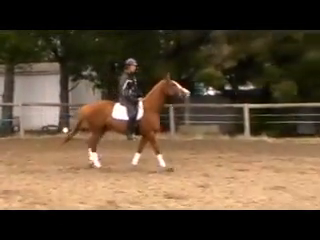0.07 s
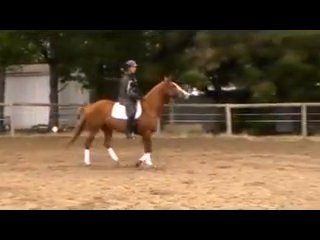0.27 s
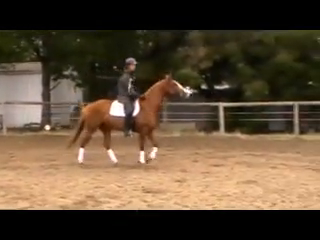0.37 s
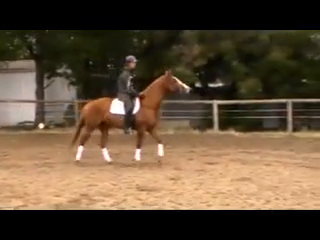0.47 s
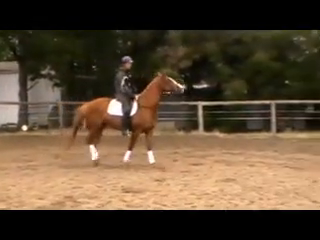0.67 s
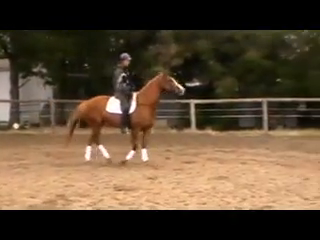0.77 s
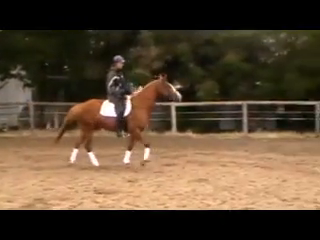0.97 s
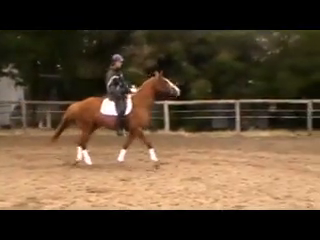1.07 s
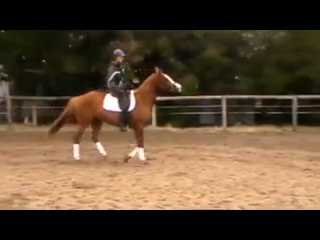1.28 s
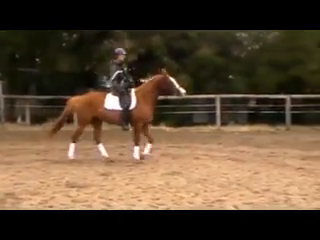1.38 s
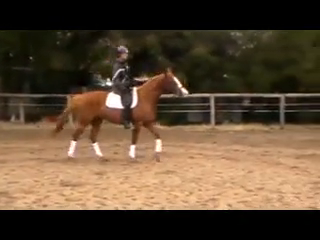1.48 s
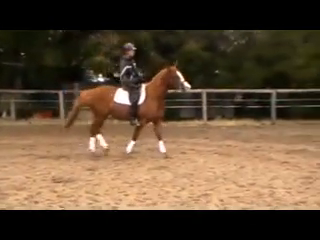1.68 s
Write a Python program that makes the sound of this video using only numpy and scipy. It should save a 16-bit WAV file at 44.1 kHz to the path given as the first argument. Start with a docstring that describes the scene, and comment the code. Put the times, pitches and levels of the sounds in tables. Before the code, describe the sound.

A horse whinnies close by, a high squeal breaking into a hoarse, wavering call.

```python
"""Riding gear (tack) ticks over wind rumbling on the microphone, then a horse whinnies close by in an
open sand arena. Its fast-vibrating vocal folds make a rising squeal, which breaks into a hoarse roar
of air rushing through the throat; a low wavering voice joins in and fades. Hooves thud softly on
the sand, small birds chirp, and a short echo follows."""
import sys
import numpy as np
from scipy import signal
from scipy.fft import rfft, irfft
from scipy.io import wavfile
from scipy.ndimage import uniform_filter1d, map_coordinates

SR = 44100
rng = np.random.default_rng(int(sys.argv[2]) if len(sys.argv) > 2 else 0)


def persist_wave(psi):
    """Save psi, clipped to +-1, as 16-bit WAV."""
    counts = np.round(np.clip(psi, -1, 1) * 32767).astype(np.int16)
    wavfile.write(sys.argv[1], SR, np.atleast_2d(counts).T)


N = 77175
T = np.arange(N) / SR
FREQ_HZ = np.fft.rfftfreq(N, 1 / SR) + 1  # the extra 1 Hz avoids log(0)


def from_db(db):
    return 10 ** (np.asarray(db) / 20)


def curves(table, outside=None):
    """Join a table's rows with straight lines in time: one curve per column after the first."""
    times, *columns = np.array(table, float).T
    return [np.interp(T, times, column, outside, outside) for column in columns]


def colour(table, hz):
    """Gain at each frequency, from rows of frequency_hz, gain_db."""
    points_hz, db = np.array(table, float).T
    return from_db(np.interp(np.log(hz), np.log(points_hz), db, left=db[0] - 90))


def noise(gain, channels=1):
    """Noise of average power 1, its frequencies weighted by gain."""
    shaped = irfft(rfft(rng.standard_normal((channels, N))) * gain, N)
    return shaped / np.sqrt(np.mean(shaped ** 2, axis=-1, keepdims=True))


def wander(rate_hz):
    """A smooth random wobble, about 1 in size."""
    return noise(1 / (1 + (FREQ_HZ / rate_hz) ** 2))[0]


def phase_of(hz):
    """The running angle of a wave whose pitch changes."""
    return 2 * np.pi * np.cumsum(hz) / SR


def during(table):
    """One while a table lasts, zero outside it, with soft ends."""
    start_s, end_s = table[0][0], table[-1][0]
    return np.interp(T, [start_s - .01, start_s, end_s, end_s + .01], [0, 1, 1, 0])


def fade(start_s, decay_s, attack_s=1e-5):
    """A quick rise, then a fall of 60 dB every decay_s."""
    age = np.maximum(T - start_s, 0)
    return (1 - np.exp(-age / attack_s)) * np.exp(-np.log(1000) * age / decay_s)


def swell(start_s, length_s):
    """A rounded rise and fall, and the progress through it from 0 to 1."""
    progress = np.clip((T - start_s) / length_s, 0, 1)
    return np.sqrt(np.abs(np.sin(np.pi * progress))) * (progress < 1), progress


def air():
    """A faint outdoor hiss, mostly the same in both ears."""
    # tone of the hiss: frequency_hz, gain_db
    spectrum = [(88, -58), (150, 3.5), (2920, -15.5), (8150, -22), (11200, -33), (13000, -70)]
    hiss = noise(colour(spectrum, FREQ_HZ), channels=3)
    return (0.33 * hiss[0] + 0.13 * hiss[1:]) * from_db(-39 + 1.3 * wander(3.6))


def wind():
    """Gusts hit the microphone and make a deep, uneven rumble."""
    # tone of the rumble: frequency_hz, gain_db
    spectrum = [(12, -49), (20, -11), (170, -4.5), (290, -120)]
    # strength of the wind: time_s, gain_db
    strength = [(0, -55.5), (.35, -56.5), (.55, -39.5), (1.1, -51.5), (1.75, -44.5)]
    gust = noise(colour(spectrum, FREQ_HZ) / (1 + (FREQ_HZ / 140) ** 6), channels=2)
    shifted = signal.hilbert(gust[0]).imag  # the left gust, a quarter cycle later
    stereo = np.array([1.45 * gust[0], 0.57 * gust[1] + 1.4 * shifted])
    return stereo * from_db(curves(strength)[0] + 3.14 * wander(24))


def tack_ticks():
    """The riding gear makes short dry clicks, each with a faint tail."""
    # clicks: start_s, peak_db, centre_hz, width_hz
    clicks = [(0.048, -33.5, 1830, 1190), (0.085, -18.5, 4400, 6770), (0.1215, -34.5, 1267, 1410),
              (0.156, -36, 3380, 1550), (1.552, -39.5, 8670, 4000), (1.617, -38, 7000, 8100),
              (1.669, -30.5, 5500, 7040)]
    out = 0
    for start_s, db, hz, width_hz in clicks:
        edges_hz = np.clip([hz - width_hz / 2, hz + width_hz / 2], 100, .45 * SR)
        snap = fade(start_s, decay_s=0.015, attack_s=0.00037)
        tail = from_db(-33) * fade(start_s, decay_s=0.05)
        burst = rng.standard_normal(N) * (snap + tail)
        click = signal.sosfilt(signal.butter(2, edges_hz, "band", fs=SR, output="sos"), burst)
        out = out + from_db(db) * click / np.abs(click).max()
    return out


def throat():
    """The throat boosts some frequencies (its resonances) and muffles those between."""
    # resonances: centre_hz, width_hz, gain_db
    resonances = [(584.5, 130, 1.5), (966, 133, -2.5), (1610, 139, -1.5), (1890, 320, -7), (2247, 200, -1),
                  (3140, 480, -10.5), (3680, 370, -8.5), (5678, 290, -7.5), (6330, 610, -11.5),
                  (7920, 4400, -15.5)]
    # valleys between the resonances: frequency_hz, gain_db
    valleys = [(100, -19), (380, -91), (800, -11), (2600, -20), (5000, -23.5), (12000, -57)]
    power = colour(valleys, FREQ_HZ) ** 2
    for hz, width_hz, db in resonances:
        power = power + from_db(db) ** 2 / (1 + (2 * (FREQ_HZ - hz) / width_hz) ** 2) ** 2
    return np.sqrt(power)


def roar(voice_cycle, mouth):
    """Air rushes through throat and chest, puffing once per cycle of the low voice."""
    # borders of four noise bands: frequency_hz
    edges = [440, 1250, 2700, 4900, 14000]
    # loudness of the bands: time_s, low_db, low_mid_db, high_mid_db, high_db
    loudness = [(.17, -68, -82, -81.5, -71), (.195, -59, -40, -63, -51.5), (.215, -43.5, -35.5, -43.5, -48),
                (.28, -38, -28, -34, -34.5), (.31, -55, -38, -58, -39.5), (.43, -49.5, -30, -32, -34),
                (.46, -35.5, -24.5, -26, -35), (.55, -31, -21.5, -24.5, -35.5),
                (.672, -29, -17, -25.5, -32), (.705, -31, -23, -33, -34.5), (.765, -20, -17, -27, -33.5),
                (.81, -23.5, -19, -30.5, -35.5), (.862, -26, -22.5, -29.5, -28),
                (.885, -20.5, -18, -27.5, -33), (.958, -30, -22.5, -32, -32),
                (1.006, -25.5, -20, -25.5, -33), (1.04, -24, -22, -31, -33),
                (1.064, -28.5, -26, -28.5, -35), (1.145, -24.5, -21, -29.5, -31.5),
                (1.208, -25.5, -28.5, -32, -32.5), (1.213, -25, -17.5, -30.5, -34),
                (1.27, -23, -24.5, -33.5, -34.5), (1.33, -28.5, -27, -37, -36.5),
                (1.388, -20, -28, -39.5, -35.5), (1.432, -32, -32.5, -35.5, -37.5),
                (1.47, -38, -38, -44.5, -46), (1.54, -51.5, -51.5, -53, -64.5), (1.7, -57, -66, -102, -74)]
    # flutter in each band's loudness: relative_depth
    flutters = [1.2, .8, 1.2, 1.8]
    mouth_swings = [.05, .015, .02, .01]
    chest_hz, chest_width_hz, chest_db = 240, 125, -14.5
    shape, shared_flutter, levels = throat(), wander(16), curves(loudness, outside=-87)
    chest = noise(1 / (1 + (2 * (FREQ_HZ - chest_hz) / chest_width_hz) ** 4))[0]
    out = chest * from_db(levels[0] + chest_db)
    for low_hz, high_hz, db, flutter, swing in zip(edges, edges[1:], levels, flutters, mouth_swings):
        band = noise(shape * (FREQ_HZ >= low_hz) * (FREQ_HZ < high_hz))[0]
        # reading the noise faster or slower slides the resonances with the mouth
        speed = 1 + swing * mouth + .008 * wander(5.01)
        band = map_coordinates(band, [np.cumsum(speed)], order=3, mode="mirror")
        out = out + band * from_db(db + flutter * (0.27 * shared_flutter + 1.23 * wander(17)))
    return out * (1 + 0.14 * voice_cycle)


def squeal():
    """Vocal folds vibrate fast; uneven pulses add tones at halves and quarters of the pitch."""
    # squeal: time_s, pitch_hz, main_tone_db, overtones_db, half_tones_offset_db, roughness (0 to 1)
    path = [(.18, 1020, -60, -68, -30, 0.4), (.192, 1090, -41.5, -53, -30, 0.52),
            (.212, 1221, -40.5, -48, -30, 0.42), (.228, 1286, -24.5, -38, -14, 0.54),
            (.268, 1360, -24.5, -24, -24, 0.37), (.295, 1420, -23.5, -32.5, 5, 0.65),
            (.31, 1436, -34, -23, -7, 0.02), (.372, 1464, -33, -24.5, 0.5, 0.1),
            (.445, 1487, -31.5, -17.5, -1.5, 0.16), (.455, 1550, -18.5, -30, 4, 0.5),
            (.482, 1562, -19.5, -33.5, -8, 0.16), (.522, 1540, -22, -18.5, -6, 0.3),
            (.562, 1615, -17.5, -27.5, -9, 0.04), (.59, 1575, -24, -36, -20, 0.01),
            (.62, 1592, -18.5, -32, -17, 0.11), (.648, 1585, -19.5, -26.5, -2, 0.46),
            (.68, 1570, -63, -45, -14, 0.65)]
    # colour of the overtones: frequency_hz, gain_db
    spectrum = [(640, -21), (1840, -15), (2200, -0.5), (2600, -19), (2950, -19.5), (3200, 3), (3680, -4),
                (4420, -9), (4640, -21), (5150, -45), (5800, -14.5), (6500, -41), (9500, -18.5),
                (12500, -40.5)]
    pitch_wobble, flutter_db = 0.0333, 2  # at full roughness
    hz, main_db, overtones_db, half_db, roughness = curves(path)
    quarter_db = half_db - 15.5
    phase = phase_of(hz / 4 * (1 + pitch_wobble * roughness * wander(150)))
    out = 0
    for k in range(2, 34):  # k counts quarters of the pitch, so 4 is the main tone
        if k == 4:
            gain = from_db(main_db)
        else:
            offset_db = quarter_db if k % 2 else half_db if k % 4 else 0
            gain = from_db(overtones_db + offset_db) * colour(spectrum, k * hz / 4)
        flutter = from_db(flutter_db * roughness * wander(100))
        out = out + gain * flutter * np.sin(k * phase + k * k)
    return np.sqrt(2) * out * during(path)


def hooves():
    """Hooves land on sand with dull thuds."""
    # thuds: start_s, level_db, pitch_hz
    thuds = [(0.18, -31, 106.4), (0.503, -24.5, 110), (0.622, -27, 83.5), (1.596, -34, 81),
             (1.721, -28.5, 96)]
    out = 0
    for start_s, db, hz in thuds:
        level = from_db(db) * fade(start_s, decay_s=0.15, attack_s=0.001)
        out = out + level * np.sin(2 * np.pi * hz * (T - start_s))
    return out


def middle_tone():
    """A second tone under the squeal: a short note, then a longer one."""
    # course of the tone: time_s, pitch_hz, level_db
    path = [(.19, 940, -52), (.198, 915, -31.5), (.218, 882, -47), (.52, 549.5, -63), (.56, 581.3, -29),
            (.6, 569.5, -27), (.67, 627, -23.5), (.705, 571, -19.5), (.73, 556, -50)]
    hz, db = curves(path)
    phase = phase_of(hz * (1 + 0.018 * wander(53)))
    return np.sqrt(2) * from_db(db) * during(path) * np.sin(phase)


def birds():
    """Small birds whistle gliding, slightly wavering notes."""
    # chirps: start_s, length_s, start_hz, end_hz, level_db, waver (fraction of the pitch)
    chirps = [(0.347, 0.035, 6350, 7720, -25.5, 0.0217), (0.37, 0.031, 7650, 7160, -27, 0.059),
              (0.468, 0.058, 7200, 7350, -30, .02), (1.641, 0.039, 7980, 7880, -48.5, 0.041),
              (1.642, 0.051, 4250, 3910, -48, 0.0617), (1.684, 0.066, 4470, 4280, -54, 0.033)]
    out = 0
    for start_s, length_s, start_hz, end_hz, db, waver in chirps:
        level, progress = swell(start_s, length_s)
        hz = (start_hz + (end_hz - start_hz) * progress) * (1 + waver * wander(329))
        out = out + from_db(db) * level * np.sin(phase_of(hz))
    return out


def throat_rings():
    """Mostly throat resonances ring briefly as unsteady tones."""
    # ringing tones: start_s, length_s, pitch_hz, level_db
    rings = [(0.434, .12, 4450, -33.5), (0.879, 0.089, 965, -29.5), (.66, 0.15, 3090, -30.5),
             (0.725, 0.061, 2246, -24.5), (.74, 0.094, 5780, -28), (0.956, 0.075, 3320, -31),
             (0.968, 0.11, 2360, -23), (1.109, 0.056, 3388, -27.5), (1.099, 0.054, 2228, -29),
             (1.215, 0.086, 2250, -27)]
    out = 0
    for start_s, length_s, hz, db in rings:
        level, _ = swell(start_s, length_s)
        phase = phase_of(hz * (1 + .012 * wander(60)))
        out = out + from_db(db + 3 * wander(60)) * level * np.sin(phase)
    return np.sqrt(2) * out


def low_voice():
    """A low, nearly pure, wavering voice; also gives its cycle and the mouth's movement for the roar."""
    # course of the voice: time_s, pitch_hz, level_db
    path = [(.695, 224.9, -54), (.712, 234.4, -22), (.728, 239.7, -24), (.758, 251.9, -42),
            (.8, 245.7, -24.5), (.835, 240, -23), (.875, 278.5, -39), (.92, 248.9, -22.5),
            (.95, 213.5, -22), (.975, 255.6, -30), (1.0, 296.8, -41), (1.035, 236, -21.5),
            (1.075, 163, -15.5), (1.105, 201, -26.5), (1.135, 240, -22), (1.17, 200.3, -18.5),
            (1.2, 156.4, -15), (1.23, 193.8, -21), (1.262, 234.3, -18.5), (1.295, 179.9, -18.5),
            (1.325, 140.3, -23.5), (1.378, 160.9, -19.5), (1.41, 162.8, -19.5), (1.428, 155.9, -62),
            (1.452, 158.7, -28), (1.51, 151.4, -34.5), (1.6, 141, -54)]
    # overtone: pitch_multiple, gain_db
    overtones = [(3, -6)]
    resonance_low_hz, resonance_top_hz, mouth_rest_hz = 490, 690, 211
    hz, db = curves(path)
    hz = uniform_filter1d(hz, size=500)  # round off the corners
    phase = phase_of(hz * (1 + 0.01877 * wander(49.4)))
    voice = from_db(2.8 * wander(60)) * np.sin(phase)
    brighten_db = 6 * np.tanh(np.gradient(hz) * SR / 800)  # brighter while the pitch climbs
    for k, gain_db in overtones:
        # the overtone is muffled outside the throat's first resonance
        muffle = 1 + (resonance_low_hz / (k * hz)) ** 12 + (k * hz / resonance_top_hz) ** 20
        voice = voice + from_db(gain_db + brighten_db + 2.5 * wander(30)) / muffle * np.sin(k * phase)
    sounding = during(path)
    mouth = np.log(hz / mouth_rest_hz) * sounding
    return np.sqrt(2) * voice * from_db(db) * sounding, np.sin(phase) * sounding, mouth


def echo(sound, level_db=-7):
    """The arena returns a short, bright echo, different in each ear."""
    tail = noise(0.18 + FREQ_HZ / (FREQ_HZ + 5000), channels=2) * fade(0.0052, decay_s=0.27)
    tail = tail * from_db(level_db) / np.sqrt(np.sum(tail ** 2, axis=-1, keepdims=True))
    return np.array([signal.fftconvolve(sound, side)[:N] for side in tail])


def scene():
    """The near horse and the far birds sit slightly left, with echo, air and wind around them."""
    middle = middle_tone()
    low, voice_cycle, mouth = low_voice()
    whinny = middle + low + squeal() + throat_rings() + roar(voice_cycle, mouth)
    near = whinny + tack_ticks() + hooves()
    far = birds()
    pan = from_db([[0.75], [-0.75]])
    return (near + far) * pan + echo(near + 2 * far) + air() + wind()


def record(dry):
    """A steep filter cuts the highest treble."""
    top_hz = 12900
    return signal.sosfilt(signal.ellip(8, .2, 70, top_hz, fs=SR, output="sos"), dry)


dry = scene()
out = record(dry)
persist_wave(out)
```